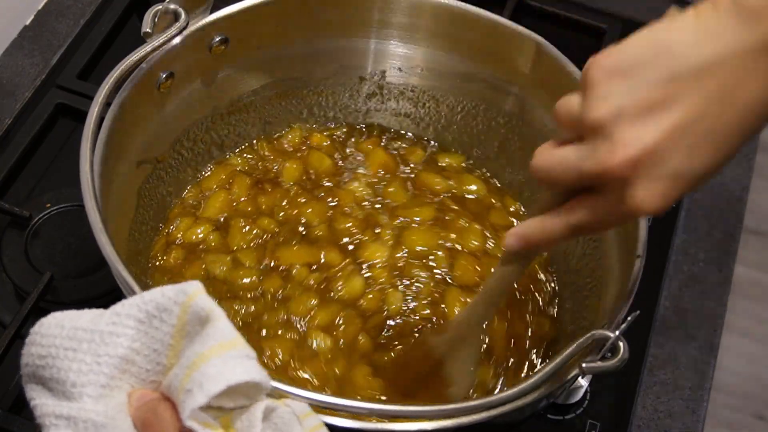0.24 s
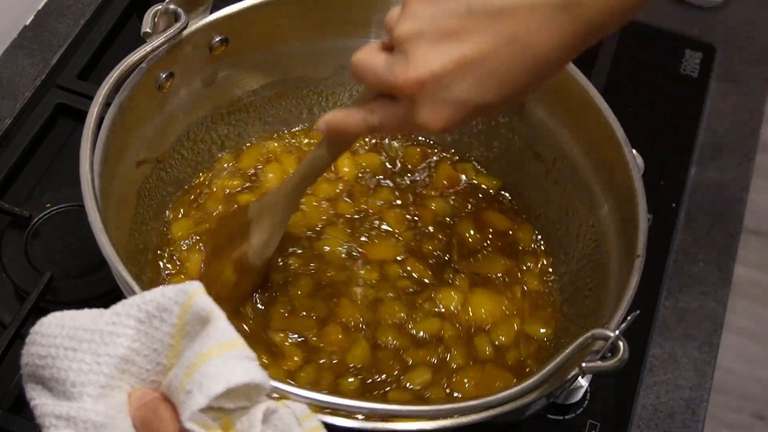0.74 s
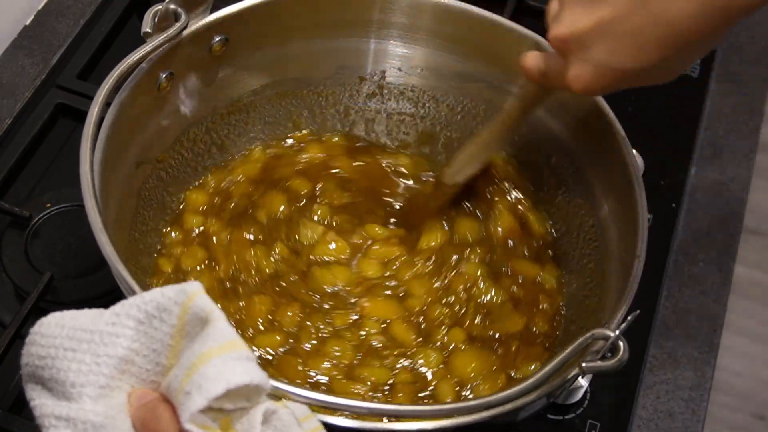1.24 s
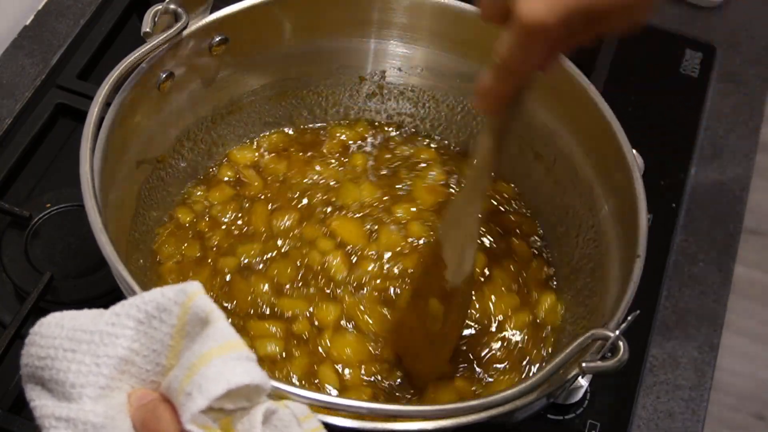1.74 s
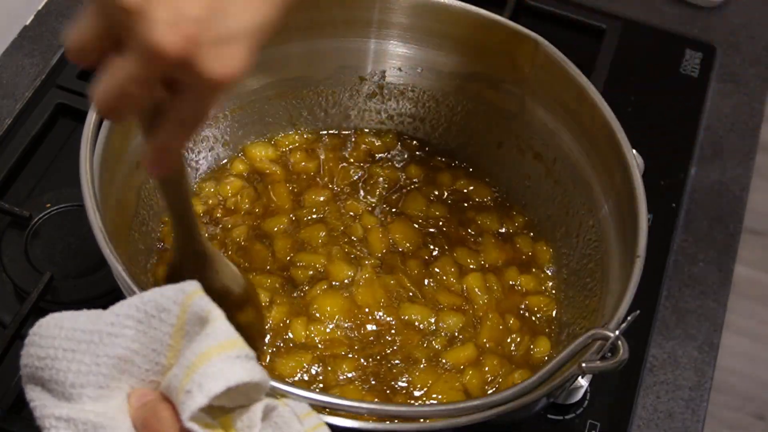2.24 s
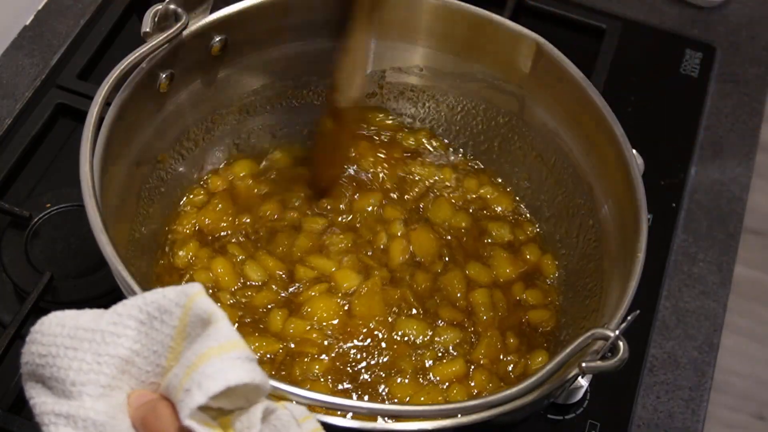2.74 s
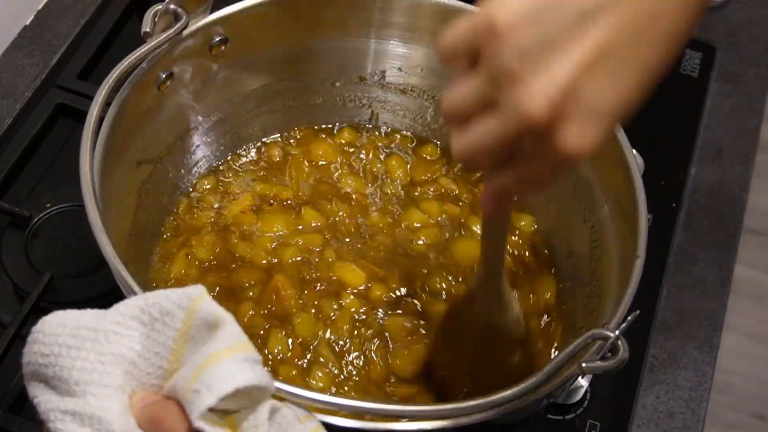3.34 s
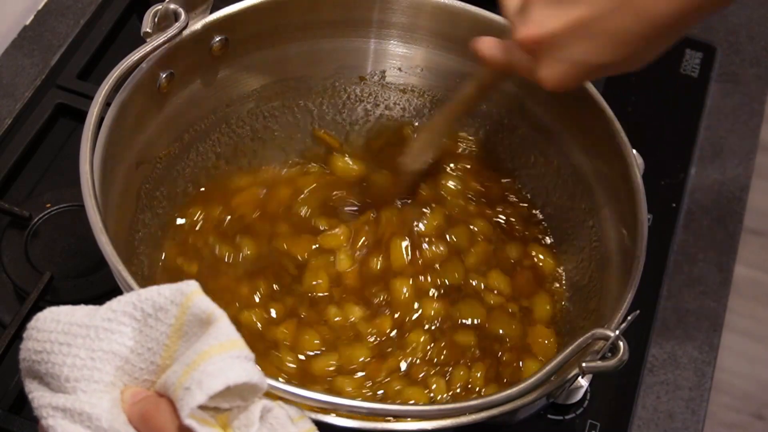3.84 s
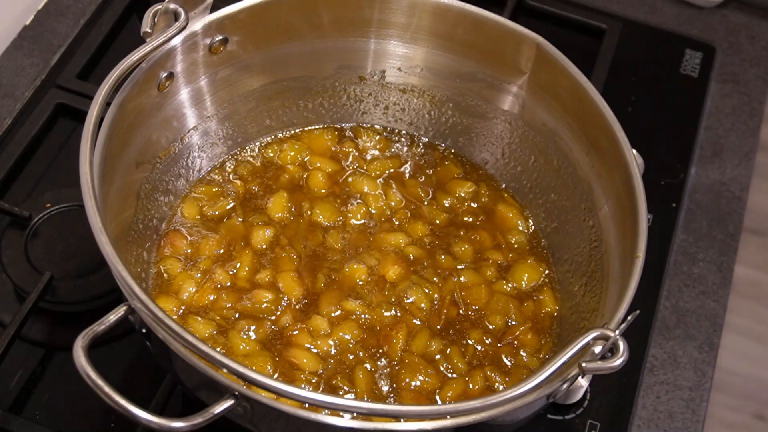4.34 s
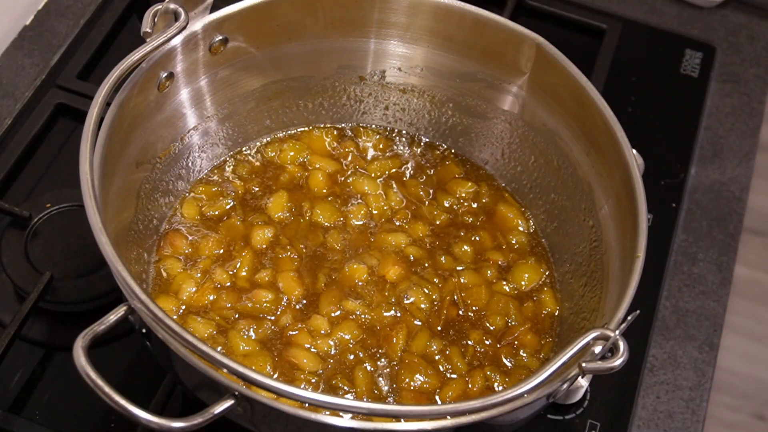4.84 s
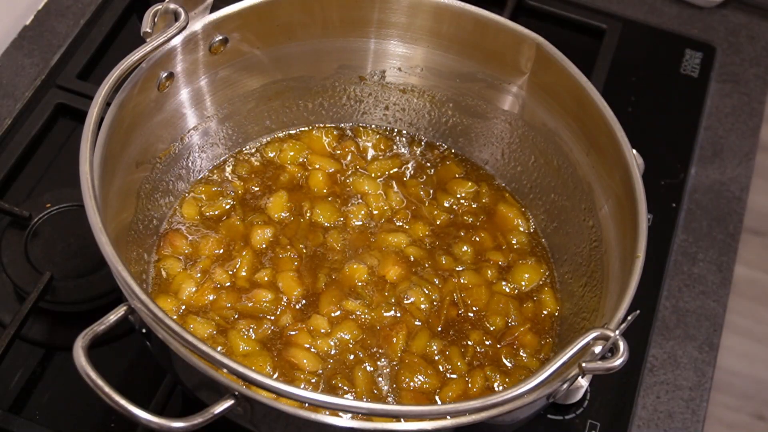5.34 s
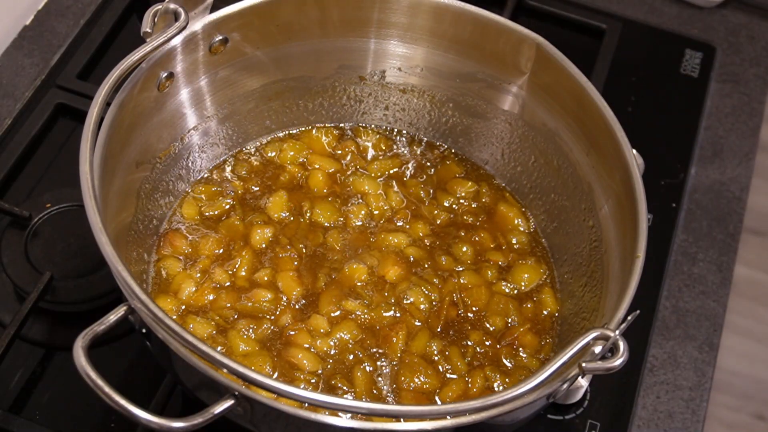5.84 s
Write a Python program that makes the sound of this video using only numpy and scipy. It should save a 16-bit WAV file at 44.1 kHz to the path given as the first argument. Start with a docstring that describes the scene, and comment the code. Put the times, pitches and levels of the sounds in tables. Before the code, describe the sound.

Close stereo kitchen sound: thick jam simmers with tiny pops over a gas hiss, with a blowing, humming machine behind. A wooden spoon swishes softly, then knocks the steel pan and scrapes its ringing wall. Dry clacks follow, then a sudden hard clatter with low worktop thuds. The hum fades away, leaving a thinner, fluttering simmer and tiny high whistles.

```python
"""Jam on a gas hob

A steel pan of jam simmers and pops. Gas noise hisses through the burner's jet resonances and one jet whistles
in short tone bursts; a mains machine adds blowing noise and hum that falter, and the hum then fades away.
A wooden spoon swishes as noise and knocks and scrapes the resonant pan wall. Short dry clacks, a clatter
and low worktop thuds follow. From 3.1 s the background flutters in level and phase.
"""
import sys
import numpy as np
from scipy import signal
from scipy.fft import rfft, irfft, next_fast_len
from scipy.io import wavfile
from scipy.ndimage import uniform_filter1d, map_coordinates

SR = 44100
rng = np.random.default_rng(int(sys.argv[2]) if len(sys.argv) > 2 else 0)


def file_out(sig):
    """Save sig as 16-bit WAV at sys.argv[1]."""
    # one column per channel
    cols = np.atleast_2d(sig).T
    # limit, then scale
    lim = np.clip(cols, -1, 1)
    pcm = np.round(lim * 32767).astype(np.int16)
    wavfile.write(sys.argv[1], SR, pcm)


N = 269010  # length [samples]


def amp(db):
    """Decibels to linear gain."""
    return 10 ** (np.asarray(db) / 20)


def unit(x):
    """Scale to an rms of 1."""
    return x / np.sqrt(np.mean(x ** 2) + 1e-20)


def along(points, hz):
    """Read (frequency [Hz], value) points on a log frequency axis."""
    f, v = np.transpose(points)
    return np.interp(np.log(hz + 1), np.log(f + 1), v)


def curves(rows):
    """Draw one automation curve for each column after the time."""
    s, *cols = np.transpose(rows)
    return [np.interp(np.arange(N) / SR, s, c) for c in cols]


def wobble(rate):
    """A smooth random curve with `rate` knots a second."""
    knots = rng.standard_normal(int(N * rate / SR) + 4)
    return map_coordinates(knots, [np.arange(N) * rate / SR])


def filtered(x, response):
    """Multiply the spectrum of x by a complex response of frequency."""
    n = x.shape[-1]
    m = next_fast_len(n + 4096)
    return irfft(rfft(x, m) * response(np.fft.rfftfreq(m, 1 / SR)), m)[..., :n]


def mode(f, hz, width):
    """Response of one causal resonance, 1 at its centre."""
    return 1j * f * width / (hz * hz - f * f + 1j * f * width)


def peaks(modes, f):
    """Gain of steep-skirted resonances whose powers add."""
    return np.sqrt(sum(amp(2 * db) * np.abs(mode(f, hz, w)) ** 4 for hz, w, db in modes))


# Stereo likeness of the noises: (frequency [Hz], left-right correlation)
ALIKE = [(40, .9997), (100, 0.99), (250, 0.98), (500, 0.94), (1000, 0.88), (2400, 0.95), (6000, 0.78),
         (10000, 0.61), (15000, 0.12)]


def rush(gain, patchy_db=1.5):
    """Coloured stereo noise of rms 1, with random loud and soft patches over time and frequency."""
    z = signal.stft(rng.standard_normal((2, N)), nperseg=1024)[2]
    field = rng.standard_normal(z.shape[1:])
    field = uniform_filter1d(uniform_filter1d(field, 3, 0), 4, 1)
    pair = signal.istft(z * amp(patchy_db * unit(field)), nperseg=1024)[1][:, :N]

    def mid_side_gain(f):
        turn = np.arccos(np.clip(along(ALIKE, f), -1, 1)) / 2
        return gain(f) * [np.cos(turn), np.sin(turn)]

    mid, side = filtered(pair, mid_side_gain)
    return unit(np.array([mid + side, mid - side]))


# Burner level, which the simmer follows too: (time [s], level [dB])
HISS_LEVEL = [(0, -46), (2.1, -46), (3.09, -48.5), (3.12, -51.5), (3.3, -49), (3.8, -51), (4.2, -49),
              (6.1, -50)]
# Resonances of the burner jets: (frequency [Hz], width [Hz], relative level [dB])
JET_MODES = [(1044, 99, -7), (1863, 124, 4.5), (2103, 137, 0), (1917, 280, -0.5), (4688, 630, -1),
             (7130, 430, 0.5), (7640, 760, -12.5), (9330, 390, -19.5), (10680, 460, -20.5),
             (12100, 420, -19), (12950, 400, -34), (14200, 400, -31)]
# Late ring added to the hiss: (start [s], frequency [Hz], width [Hz], gain [dB])
FOCUS = (4.5, 1968, 190, -4.5)


def burner_hiss(level_db):
    """Rushing gas is noise shaped by the jet resonances; late on it gathers on one band."""
    jets = amp(level_db + 0.27 * wobble(8.8)) * rush(lambda f: peaks(JET_MODES, f), patchy_db=1.36)
    start_s, hz, width, ring_db = FOCUS
    late = np.arange(N) / SR > start_s
    ring = filtered(jets, lambda f: mode(f, hz, width))
    return jets + amp(ring_db) * late * ring


# Broad simmer spectrum: (frequency [Hz], relative level per Hz [dB])
SIMMER_COLOUR = [(25, 0.5), (60, 2.5), (100, -9), (160, -9.5), (208, -1), (260, -11), (400, -10.5),
                 (600, -35.5), (1500, -19), (3500, -24), (6000, -36.5), (8500, -18), (10000, -40.5),
                 (15700, -46)]


def simmer(level_db):
    """The seething jam is broad noise 3.5 dB under the burner's level curve."""
    return amp(level_db - 3.5 + 0.24 * wobble(8.3)) * rush(lambda f: amp(along(SIMMER_COLOUR, f)))


# Machine air spectrum before its resonances: (frequency [Hz], relative level per Hz [dB])
AIR_COLOUR = [(25, -54), (50, -10), (150, -2.5), (400, 0), (600, -8), (1500, -10.5), (2190, -10.5),
              (3500, -16.5), (6000, -16.5), (9000, -19.5), (11000, -30.5), (15700, -37)]
# Narrow housing resonance: (frequency [Hz], width [Hz], gain [dB])
CASING = (2185, 11.3, 15.2)
# Wider resonance of the same housing: (frequency [Hz], width [Hz], gain [dB])
HOUSING = (2217, 147, 4.9)


def machine_air(level_db):
    """Blown air is broad noise that makes the machine's housing sing."""
    noise = rush(lambda f: amp(along(AIR_COLOUR, f)) * (1 + peaks([CASING, HOUSING], f)))
    return amp(level_db + 0.4 * wobble(5.42)) * noise


MAINS_HZ = 50
# Hum harmonics: (multiple of the mains, relative level [dB])
HUM = [(1, -12), (2, -5), (4, -0.5), (6, -4.5), (8, -5)]


def machine_hum(level_db):
    """Mains hum is a stack of harmonics, each wavering in level."""
    t = np.arange(N) / SR
    hum = 0
    for k, db in HUM:
        tone = np.sin(2 * np.pi * k * MAINS_HZ * t + rng.uniform(0, 2 * np.pi))
        hum = hum + amp(db + 0.41 * wobble(12)) * tone
    return amp(level_db) * unit(hum)


FLUTTER_FROM_S, FLUTTER_HZ = 3.1, 43.07
THROB_DB, UNEVEN_DB, SLIP_RAD = 1.65, 0.69, 0.648  # sine peak; spread of the random curves


def flutter(bed):
    """An even throb, uneven level changes and phase slips that smear every tone."""
    t = np.arange(N) / SR
    on = t > FLUTTER_FROM_S
    throb_db = THROB_DB * np.sin(2 * np.pi * FLUTTER_HZ * t) + UNEVEN_DB * wobble(FLUTTER_HZ)
    slips = np.exp(1j * SLIP_RAD * on * wobble(FLUTTER_HZ))
    analytic = signal.hilbert(bed, next_fast_len(N))[:, :N]
    return amp(on * throb_db) * np.real(analytic * slips)


# Machine levels, faltering and then falling: (time [s], air level [dB], hum level [dB])
MACHINE_LEVEL = [(0, -46, -48), (3.09, -46.5, -47.5), (3.16, -55, -52.5), (3.3, -49.5, -47.5),
                 (3.6, -51, -49), (4.2, -52, -55), (4.38, -52.5, -62), (4.46, -55, -84), (5, -56, -81)]
LOW_CUT_HZ = 38


def kitchen():
    """The steady bed of burner, simmer and machine, low-cut and then fluttering."""
    hiss_db, = curves(HISS_LEVEL)
    air_db, hum_db = curves(MACHINE_LEVEL)
    bed = burner_hiss(hiss_db) + simmer(hiss_db) + machine_air(air_db) + machine_hum(hum_db)
    return flutter(filtered(bed, lambda f: 1 / np.sqrt(1 + (LOW_CUT_HZ / (f + 1)) ** 8)))


# Whistle bursts: (time of the peak [s], level [dB])
WHISTLE = [(1.01, -52), (1.062, -48.5), (1.22, -58), (1.258, -58), (1.345, -47.5), (1.385, -53),
           (1.73, -50), (2.147, -49), (2.2, -50), (2.781, -54), (2.815, -46), (2.85, -48), (2.9, -53),
           (2.98, -46.5), (3.025, -51), (3.588, -52), (3.84, -53), (4.299, -44.5), (4.355, -60),
           (4.536, -45.5), (4.585, -51), (4.774, -55), (4.81, -55), (4.907, -42), (4.992, -53),
           (5.094, -44), (5.115, -50), (5.135, -48.5), (5.235, -56), (5.329, -46.5), (5.37, -53),
           (5.415, -44.5), (5.56, -57), (5.633, -49), (5.67, -45), (5.83, -52), (5.865, -58), (5.95, -50),
           (5.975, -41.5), (6.064, -50)]
WHISTLE_HZ, BURST_SCATTER_HZ = 8116, 28.2  # mean pitch, random spread from burst to burst
BURST_MS, FLUTTERING_BURST_MS = 21, 8.8  # half length to 1/e, before and after the flutter starts


def whistle():
    """One jet port sings in short bursts of tone with random throb and phase drift."""
    t = np.arange(N) / SR
    out = np.zeros((2, N))
    throb = amp(1.2 * wobble(100))
    slip = 0.83 * wobble(170) + 0.9 * np.array([wobble(60), wobble(60)])  # shared and per-channel drift [rad]
    for s, db in WHISTLE:
        near = slice(round((s - .1) * SR), round((s + .1) * SR))
        pitch = WHISTLE_HZ + BURST_SCATTER_HZ * rng.standard_normal()
        half_ms = BURST_MS if s < FLUTTER_FROM_S else FLUTTERING_BURST_MS
        swell = np.exp(-((t[near] - s) * 1000 / half_ms) ** 2)
        tone = np.sin(2 * np.pi * pitch * t[near] + slip[:, near])
        out[:, near] += np.sqrt(2) * amp(db) * throb[near] * swell * tone
    return out


POPS_PER_S, POP_MS = 70, 4.6  # half length to 1/e
POP_DB, POP_SPREAD_DB = -62, 2.5  # about the softest pop; rise per e-fold of rarity
# Pop spectrum: (frequency [Hz], relative level per Hz [dB])
POP_COLOUR = [(500, -20), (1500, -5), (4000, -3), (8000, -7), (15000, -26)]


def bubbles():
    """Tiny bubbles burst at random on the jam, each a short puff of noise."""
    when, size = rng.random((round(POPS_PER_S * N / SR), 2)).T
    gains = amp(POP_DB - POP_SPREAD_DB * np.log(size + .01))
    hits = np.bincount((when * N).astype(int), gains, N)
    puff = np.exp(-(np.arange(-600, 601) / SR * 1000 / POP_MS) ** 2)
    return signal.fftconvolve(hits, puff, "same") * rush(lambda f: amp(along(POP_COLOUR, f)))


# Spoon moving through the fruit: (time [s], level [dB])
STIR_LEVEL = [(0, -53), (.5, -61), (.9, -55), (1.25, -47.5), (1.6, -66), (1.9, -61), (2.05, -52.5),
              (2.25, -71)]
# Swish spectrum: (frequency [Hz], relative level per Hz [dB])
SLOSH_COLOUR = [(300, -32), (800, -14), (2000, -3.5), (3500, -5), (6000, -9), (9000, -14), (15000, -30)]


def stirring():
    """The spoon pushes through the fruit with a soft, grainy swish of noise."""
    level_db, = curves(STIR_LEVEL)
    return amp(level_db + 2.1 * wobble(29.47)) * rush(lambda f: amp(along(SLOSH_COLOUR, f)))


# Bumps carried through the worktop: (time [s], level [dB], tilt [dB per octave])
THUDS = [(4.069, -36, 6), (4.092, -31.5, 0), (4.117, -39, 4.5), (4.139, -39, 4), (4.247, -49, 9.5),
         (4.399, -48, 0)]
# Worktop tones: (frequency [Hz], half length to 1/e [ms], relative level [dB])
WORKTOP = [(50.3, 17, 2.5), (97, 14, -4.5), (235, 4.3, 1.5), (400, 3.3, -9.5)]


def thuds():
    """Soft low pushes, a few cycles long in each of the worktop's tones."""
    t = np.arange(N) / SR
    out = np.zeros(N)
    for s, db, tilt in THUDS:
        for hz, ms, tone_db in WORKTOP:
            octaves = np.log2(hz / WORKTOP[1][0])  # the tilt pivots on the second tone
            swell = np.exp(-((t - s) * 1000 / ms) ** 2)
            out += amp(db + tone_db + tilt * octaves) * swell * np.sin(2 * np.pi * hz * (t - s))
    return out


# Spoon strokes: (time of the peak [s], level [dB], rise [s], fall [s], level of the lowest wall mode [dB])
STROKES = [(2.275, -39.5, 0.034, .09, -5.5), (2.61, -42, 0.02, 0.11, -3.5), (2.7, -38, .05, 0.079, -9),
           (3, -52.5, 0.067, 0.063, -1), (3.185, -35.5, 0.027, 0.0083, -11)]
# Light contact between strokes: (start [s], end [s], level [dB])
DRAG = (2.24, 3.106, -47.5)
# Rubbing spectrum before the wall rings: (frequency [Hz], relative level per Hz [dB])
RUB_COLOUR = [(240, -26), (400, -9), (567, -18), (1310, -9), (1570, -8.5), (2190, -3), (2920, -6),
              (5270, -3.5), (15000, -29)]
# Pan wall modes under the spoon: (frequency [Hz], width [Hz], relative level [dB])
WALL = [(2137, 15, 7.5), (2380, 28, -5), (3414, 15, 4), (3820, 110, -10), (4550, 72, -16), (5260, 77, -20),
        (5900, 100, -13), (6180, 58, -2), (6840, 52, 6)]
# Lowest wall mode: (frequency [Hz], width [Hz])
WALL_LOW = (1325, 40)


def scrape():
    """Wood dragged on steel: gritty noise that wakes the wall's modes."""
    t = np.arange(N) / SR
    start_s, end_s, drag_db = DRAG
    contact = amp(drag_db) * (t > start_s) * (t < end_s)
    low_level = np.zeros(N)
    for s, db, rise, fall, low_db in STROKES:
        push = amp(db) * np.exp(np.where(t < s, -((t - s) / rise) ** 2, (s - t) / fall))
        contact = contact + push
        low_level += amp(low_db) * push
    grit = amp(0.74 * wobble(50) + 0.97 * wobble(400))
    wall = rush(lambda f: amp(along(RUB_COLOUR, f)) * (1 + 1.74 * peaks(WALL, f)))
    low = rush(lambda f: mode(f, *WALL_LOW), patchy_db=2.8)
    return grit * (contact * wall + low_level * low)


# Knocks and clacks: (time of the peak [s], level [dB], rise [ms], fall [ms], pitch [Hz], sharpness [Q])
CLACKS = [(0.136, -38.5, 1.1, 10, 3500, 1.1), (2.196, -26, 0.26, 13.3, 2480, 4.3),
          (2.21, -38.5, 12, 54, 506, 1.1), (2.395, -41, 3, 6.8, 3700, 1.1),
          (2.471, -42, 4.1, 7.1, 3500, 1.1), (3.089, -38, 5.9, 5, 2150, 1.7),
          (3.138, -27.5, 3.9, 6.1, 2390, 3), (3.263, -33.5, 4.3, 5.4, 4250, 3.7),
          (3.327, -43.5, 6.3, 6.5, 2680, 6.4), (3.401, -42, 3.2, 2.2, 1050, 2.4),
          (3.697, -42, 3, 7, 646, 1.7), (3.748, -35.5, 2.6, 2.2, 5630, 4),
          (3.817, -49, 1.5, 2.5, 3500, 1.1), (3.959, -51, 10, 10, 1510, 3.7),
          (4.25, -32.5, 5.5, 10, 1870, 2.1), (4.253, -39, 5.4, 9.8, 427, 4.6),
          (4.311, -48, 6, 6, 3520, 1.2), (4.397, -37.5, 3.7, 11.4, 3600, 0.86),
          (5.066, -45, 6.3, 7.4, 2560, 1.1)]
UNDER, UNDER_DB, TOP = 0.267, -11.5, 2.44  # lower tone / pitch, its level, treble limit / pitch
# Clatter: (time of the peak [s], level [dB], rise [ms], fall [ms], edge tone [Hz], edge tone level [dB])
CLATTER = [(4.059, -24.5, 2.1, 22, 5500, -4), (4.067, -21, 2.4, 8, 5470, 4.5),
           (4.086, -23.5, 3.8, 6.5, 6150, 4.5), (4.101, -30, 6.1, 7.7, 2800, 6),
           (4.117, -21, 4.2, 7.2, 5330, -3.5), (4.1388, -7, 0.061, 1.06, 4400, 3),
           (4.1442, -22.5, 2.4, 4.2, 5900, 6)]
# Body of the thing that clatters: (frequency [Hz], sharpness [Q], relative level [dB])
RATTLER = [(987, 3.8, 6), (1440, 1.33, 4.5)]
EDGE_Q, RATTLER_TOP_HZ = 2.25, 7250
CLACK_BLOW_DB, CLATTER_BLOW_DB = -4, -5.5  # blow against the noise burst, for an instant rise


def contacts():
    """List hits as (s, dB, rise ms, fall ms, blow dB, top Hz, tones); tones are (Hz, Q, gain, skirt order)."""
    hits = []
    for s, db, rise, fall, hz, q in CLACKS:
        tones = [(hz, q, 1, 1), (UNDER * hz, q, -amp(UNDER_DB), 1)]
        hits.append((s, db, rise, fall, CLACK_BLOW_DB, TOP * hz, tones))
    body = [(hz, q, (-1) ** k * amp(db), 1) for k, (hz, q, db) in enumerate(RATTLER)]
    for s, db, rise, fall, edge_hz, edge_db in CLATTER:
        tones = body + [(edge_hz, EDGE_Q, amp(edge_db), 2)]
        hits.append((s, db, rise, fall, CLATTER_BLOW_DB, RATTLER_TOP_HZ, tones))
    return hits


BLOW_DB_PER_MS = -2  # the slower a contact rises, the softer its blow


def clacks():
    """Each contact is a swelling, dying noise burst with a blow at its peak, ringing in a few tones."""
    size, peak = 4096, 1536  # samples in one hit, and where it peaks
    t = (np.arange(size) - peak) / SR * 1000  # ms
    out = np.zeros((2, N + size))
    for s, db, rise, fall, blow_db, top_hz, tones in contacts():
        shape = np.exp(np.where(t < 0, -(t / rise) ** 2 / 2, -(np.abs(t) / fall) ** 1.2))
        energy = np.linalg.norm(shape)
        push = rng.standard_normal((2, size)) * shape
        push[0, peak] -= amp(blow_db + BLOW_DB_PER_MS * rise) * energy
        lowest_hz = min(tones)[0]

        def contact(f):
            soft = 1 / (1 - (f / top_hz) ** 2 + 1.3j * f / top_hz) ** 2  # softness dulls the treble
            thin = (1j * f / (.55 * lowest_hz + 1j * f)) ** 2  # small parts radiate no bass
            return soft * thin

        mid, side = sum(gain * unit(filtered(push, lambda f: contact(f) * mode(f, hz, hz / q) ** order))
                        for hz, q, gain, order in tones)
        level = amp(db) * energy / np.linalg.norm(mid)
        start = round(s * SR) - peak
        out[:, start:start + size] += level * np.array([mid + .1 * side, mid - .1 * side])
    return out[:, :N]


# Reverb decay: (frequency [Hz], time to fall 60 dB [s])
ROOM = [(200, 0.2), (2000, 1), (10000, 0.63)]


def room(x):
    """A noise tail in which each frequency of the kitchen's answer dies at its own speed."""
    hz, t, z = signal.stft(rng.standard_normal((2, SR // 2)), SR, nperseg=256)
    tail = signal.istft(z * amp(-60 * t / along(ROOM, hz)[:, None]), SR, nperseg=256)[1]
    return signal.fftconvolve(x, tail / np.linalg.norm(tail[0]), axes=1)[:, :N]


def scene():
    """Mix the layers from background to foreground."""
    hits = clacks()
    early = np.arange(N) < 3 * SR  # only hits before 3 s ring on in the room; later hits are dry
    background = kitchen() + whistle() + bubbles()
    spoon = stirring() + scrape()
    return background + spoon + thuds() + hits + amp(-9.5) * room(hits * early)


# Stereo balance: (frequency [Hz], left minus right [dB])
LEAN = [(40, 0), (500, -.1), (2000, -.3), (5000, -.9), (8000, -.9), (12000, .6)]
TOP_HZ = 15750  # band limit


def record(dry):
    """The two channels lean slightly apart in level by frequency, and nothing passes the band limit."""
    return filtered(dry, lambda f: (f < TOP_HZ) * amp(np.outer([.5, -.5], along(LEAN, f))))


dry = scene()
out = record(dry)
file_out(out)
```